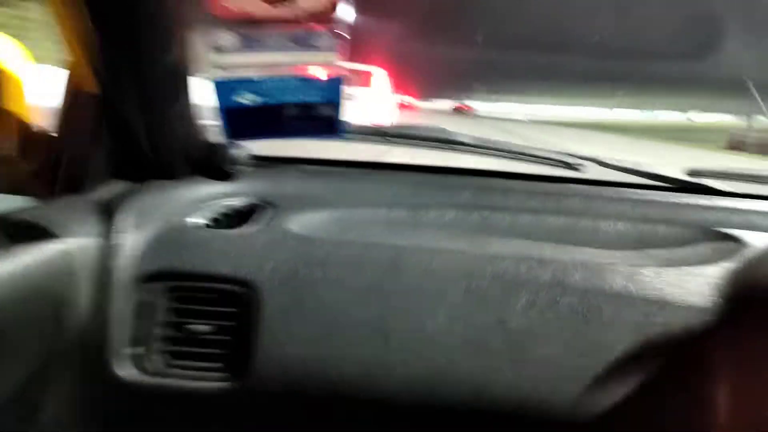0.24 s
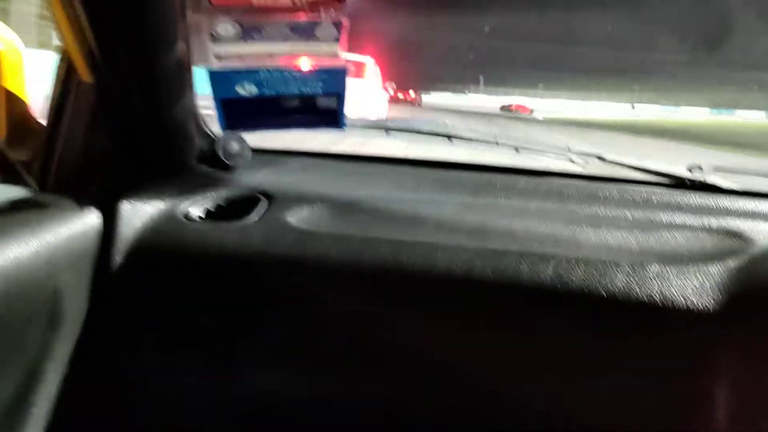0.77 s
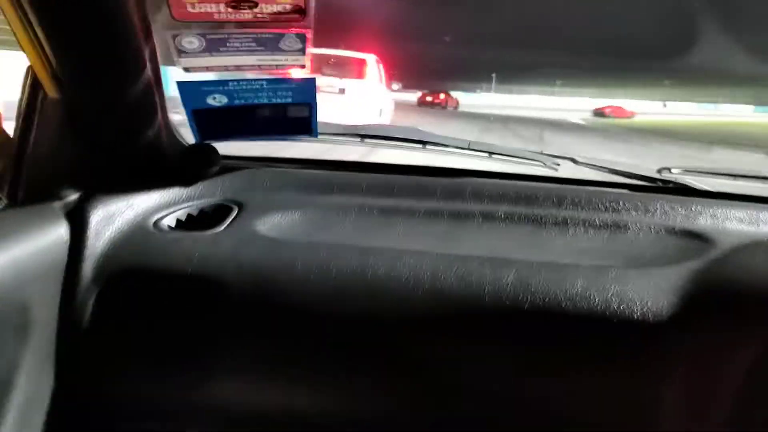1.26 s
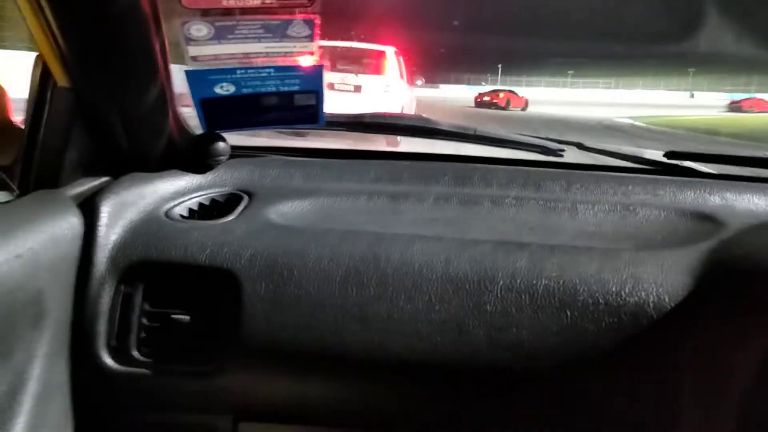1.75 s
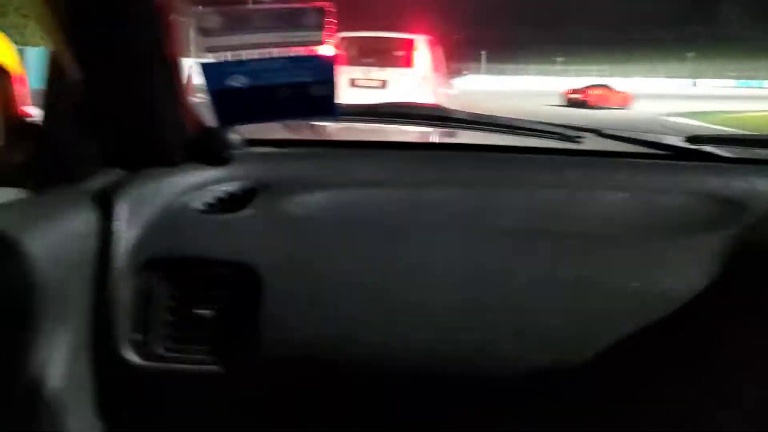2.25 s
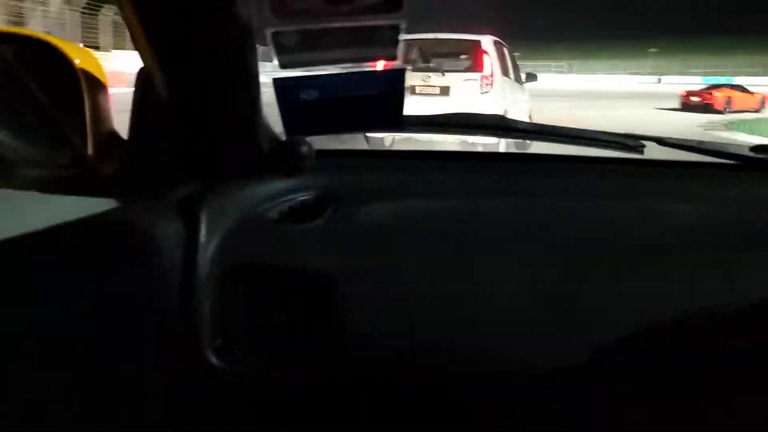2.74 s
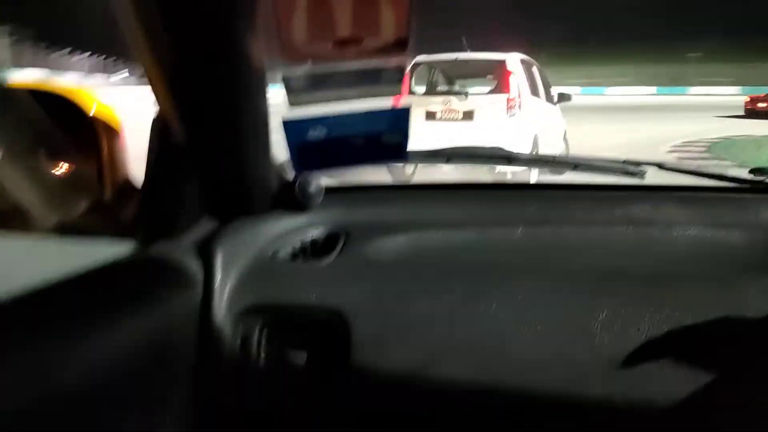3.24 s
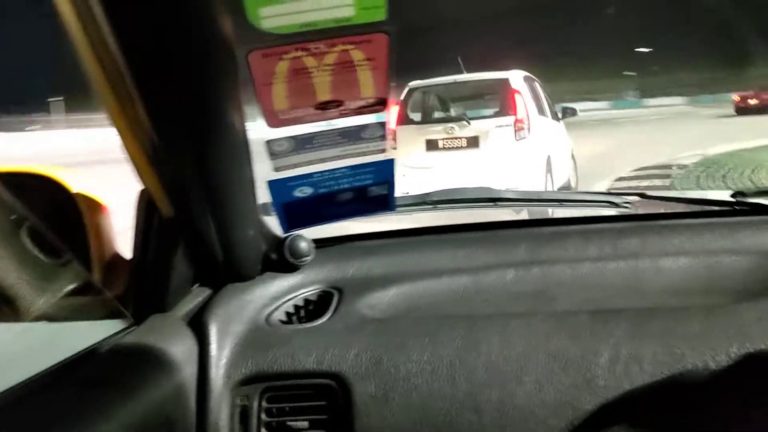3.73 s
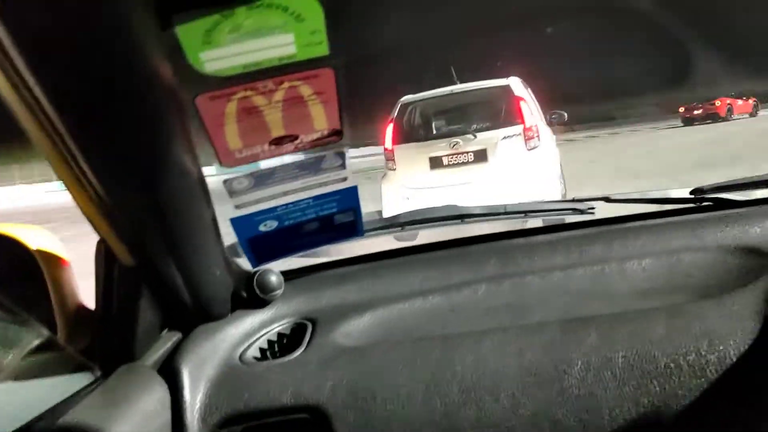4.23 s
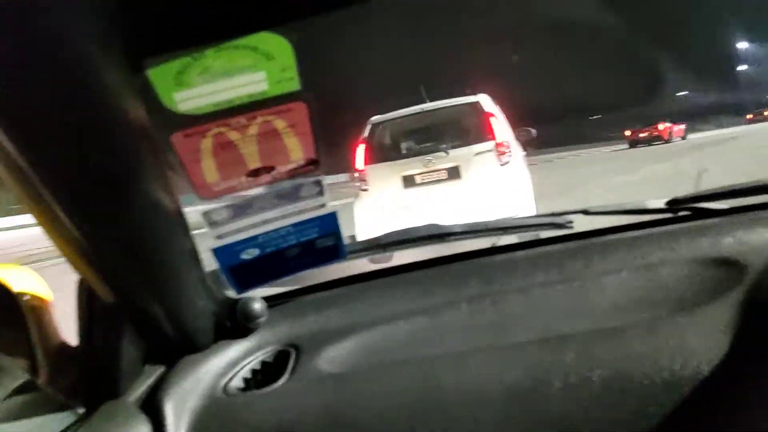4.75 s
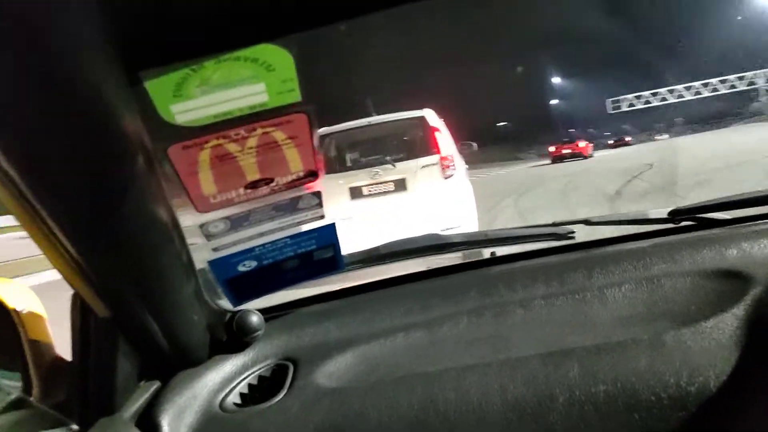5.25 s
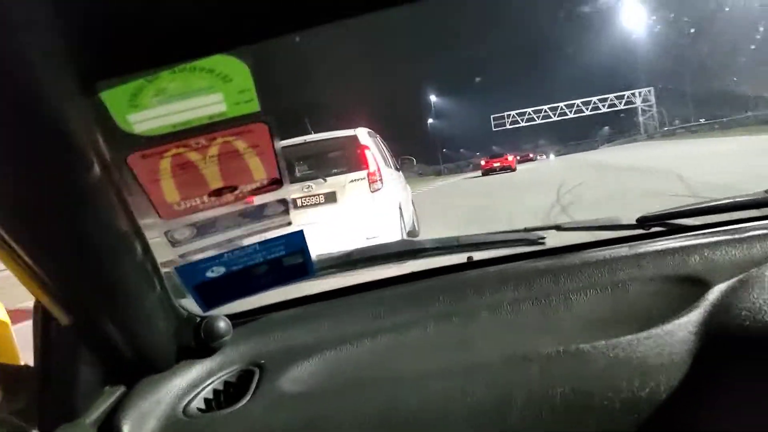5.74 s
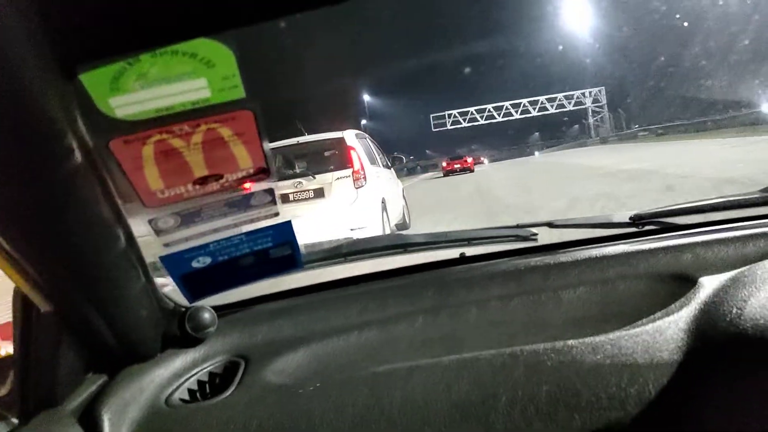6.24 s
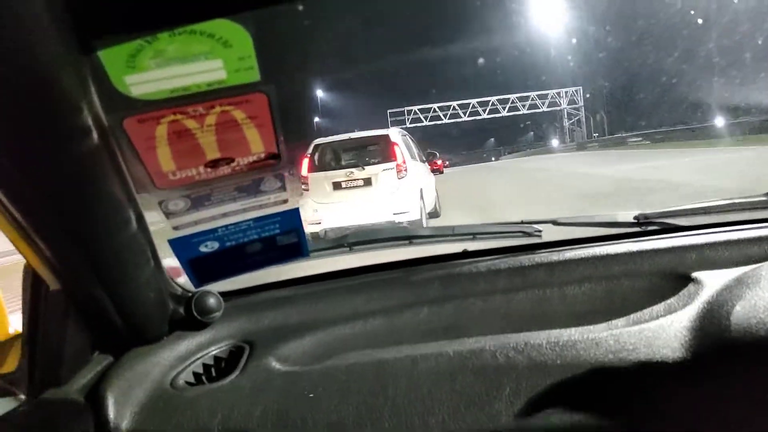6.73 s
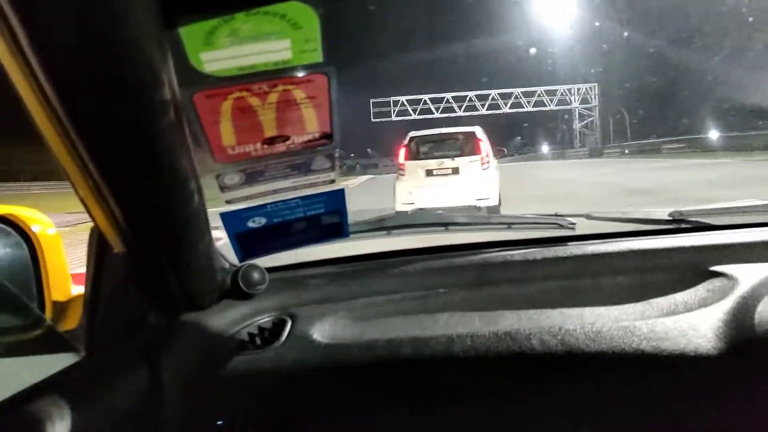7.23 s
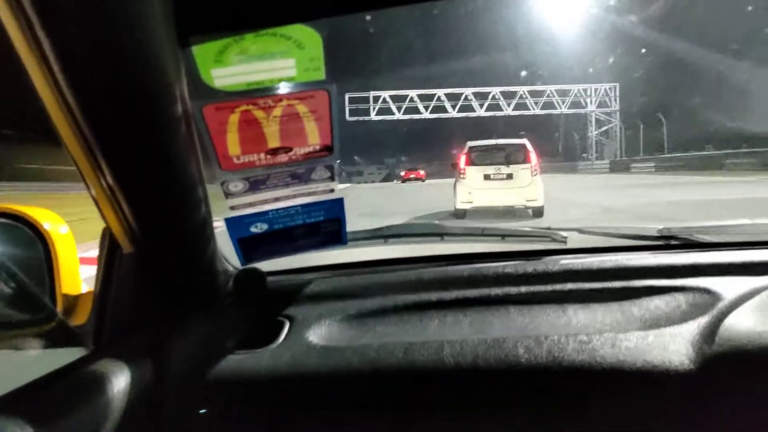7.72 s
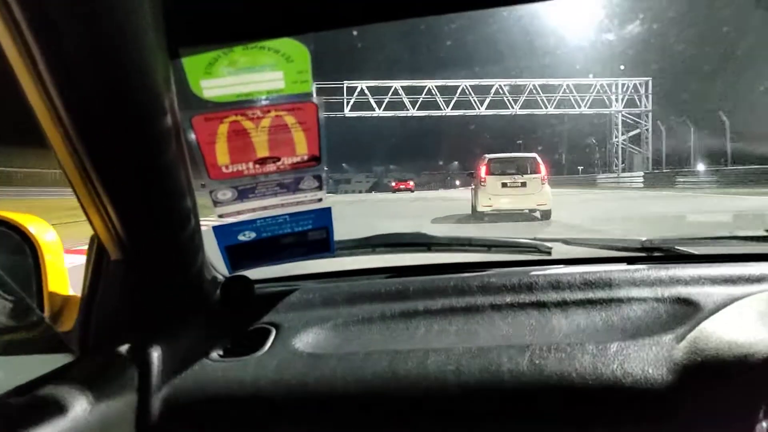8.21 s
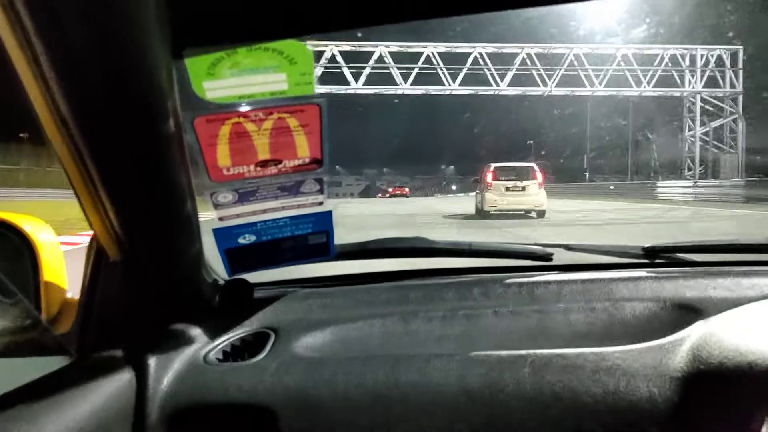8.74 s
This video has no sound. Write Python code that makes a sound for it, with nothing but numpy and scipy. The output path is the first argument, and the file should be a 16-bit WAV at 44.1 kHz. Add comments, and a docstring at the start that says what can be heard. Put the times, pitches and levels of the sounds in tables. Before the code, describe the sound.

Inside a small car's cabin on a circuit, a four-cylinder engine dominates as a deep, muffled boom. It starts off-throttle; at 0.2 s a sharp blip snaps the revs up, fading by 0.5 s, and a softer rise follows around 0.8-1.0 s as the clutch bites. From 1.2 to 3.4 s the engine coasts, pitch sliding down, with a faint sinking hum and small plastic ticks, clearest near 1.7 s. The note dips near 3.45 s, then throttle returns, rocking the pitch slightly; road roar swells around 3.9 s. At 4.2 s comes a very short mid-high squeak, with a crisp tick just after. From 4.5 s the engine pulls at full throttle, low and nearly level until 6 s, then climbing slowly and growing raspier to 9 s, still pulling. Low road rumble eases while fine trim buzz, soft hissy swells and occasional ticks continue, mostly left.

```python
"""Small car on a circuit, heard from the cabin

A four-cylinder car brakes with two throttle blips, rounds a bend and pulls away. Multiples of the firing
rate boom; a pulse train gives the rasp. Shaped noise makes road rumble, roar, buzzing trim and swelling
bands; noise bursts tick, swept sines hum and squeak. Two ports a short way apart, the left more open."""
import sys
import numpy as np
from scipy import signal
from scipy.fft import rfft, irfft, next_fast_len
from scipy.io import wavfile
from scipy.ndimage import uniform_filter1d

SR = 44100
rng = np.random.default_rng(int(sys.argv[2]) if len(sys.argv) > 2 else 0)


def pcm_store(signal):
    """Save signal as 16-bit PCM."""
    levels = np.round(np.clip(np.atleast_2d(signal), -1, 1) * 32767)
    wavfile.write(sys.argv[1], SR, levels.astype(np.int16).T)


N = 396018

# firing rate before driveline swings, two blips, long fall into the bend, pull: start_s, firings_per_s
SPEED = [(0.0, 170.0), (0.16, 163.8), (0.33, 190.6), (0.37, 194.5), (0.56, 184.3), (0.69, 180.9),
         (0.8, 186.2), (1.0, 203.8), (1.04, 205.1), (1.17, 199.0), (1.46, 190.8), (2.42, 157.1),
         (2.68, 151.2), (3.21, 145.3), (3.9, 144.0), (4.24, 142.3), (5.05, 142.2), (5.4, 141.0),
         (5.99, 142.8), (6.86, 150.9), (8.07, 162.4), (8.97, 172.0)]
# driveline rocking the revs: start_s, swing_firings_per_s, decay_s
SHUNTS = [(3.43, 2.6, .35), (4.3, 2.6, .2), (4.96, 1.1, 2.0)]
SHUNT_HZ = 3.75
# pedal: start_s, throttle_0_to_1
THROTTLE = [(0.0, 0.08), (0.14, .1), (0.19, 0.98), (0.27, .9), (0.32, 0.5), (0.38, 0.08), (0.72, 0.04),
            (0.9, 0.3), (1.2, 0.08), (3.38, 0.02), (3.56, 0.6), (3.76, 0.87), (4.33, .9), (4.55, 1),
            (8.98, 0.95)]
# engine tone in the cabin, full throttle: pitch_hz, level_db
PULLING = [(141, -8.5), (144, -8), (152, -6), (155, -6.5), (158, -11.5), (162, -17.5), (167, -14),
           (190, -12), (281, -15.5), (286, -15.5), (296, -20), (306, -22.5), (325, -19), (344, -22),
           (426, -36.5), (444, -41), (460, -35), (468, -53), (476, -33), (500, -25), (530, -31.5),
           (564, -37), (580, -30), (595, -35), (612, -45.5), (635, -47.5), (650, -40.5), (688, -35.5),
           (715, -42.5), (780, -34.5), (812, -45.5), (860, -36)]
# engine tone in the cabin, throttle shut, before the drop below: pitch_hz, level_db
COASTING = [(145, -7), (149, -7.5), (156, -10.5), (160, -16), (165, -14), (173, -19), (177, -16),
            (186, -15.5), (191, -12.5), (204, -11), (298, -37), (320, -31), (346, -40), (354, -36),
            (370, -38), (382, -35.5), (398, -26.5), (432, -41), (447, -52), (500, -41), (600, -39.5),
            (700, -54), (750, -32), (810, -33)]
# offset of firing multiples 1-5 from the coasting curve: offset_db
COAST_DROP_DB = [0.5, -1, -1, -12.5, -22.5]
# offset of multiples 1-5 while the engine spins free, throttle shut: offset_db
FREE_COAST_DB = [0.5, -9, -3, -10.5, -1.5]
# the same at full throttle: offset_db
FREE_PULL_DB = [1, -2, -1.5, -14, -7]
CLUTCH_BITES_S, CLUTCH_SLIP_S = 0.87, 0.08  # spinning free fades out over the slip, ending at the bite
# phase by which multiples 1-5 trail: lag_rad
LAG_RAD = [1.5, 2.46, -0.52, 2.5, 1.6]
# quick unsteadiness of multiples 1-5: rms_db
WAVER_DB = [0.35, 0.36, 0.74, 0.7, 0.35]
# brief sinking of the firing note, bell-shaped: centre_s, half_length_s, change_db
DIPS = [(0.0, 0.28, -4), (0.378, 0.041, -16.5), (0.544, 0.085, -4), (3.459, 0.2, -8.5), (5.414, 0.45, -1)]
# line at 11/4 of the firing rate, swelling late in the pull: start_s, level_db
ELEVENTH = [(7.7, -55), (8.05, -42), (8.3, -34), (8.7, -32), (8.98, -31)]
# crank-turn tones at 1.5, 2.5 .. 5.5 times the firing rate, full throttle: level_db
HALVES_DB = [-37.5, -48, -48.5, -56, -54]
HALF_SHUT_DB, HALF_WAVER_DB = -12, 3
RASP_SHUT_DB, RASP_OPEN_DB, RASP_POWER = -54.5, -37, 6.5  # opens late in the pedal travel
RASP_DB_PER_HZ, RASP_FROM_HZ = 0.081, 146  # full-throttle rise with firing rate
# cylinder inequality by quarters past a firing multiple, 0-3 (0 unused): gain_db
UNEVEN_DB = [-1.5, 3.5, -5.4, -0.8]
# cabin resonances passing the rasp: pitch_hz, width_hz, gain_db
CABIN = [(847, 73, -1), (1001, 65, -1), (1130, 260, -7.5), (1293, 66, -2), (1510, 35, -2.5), (1670, 85, -6),
         (1823, 120, -7), (2060, 180, -5), (2160, 150, -7), (2570, 120, -19.5), (2740, 170, -20)]
# cabin gain for lines between firing multiples: pitch_hz, gain_db
BETWEEN = [(30, -8.5), (80, -1.5), (125, 0), (190, -5.5), (250, 1), (330, -8), (410, -15), (465, -5),
           (520, -14), (600, -19.5), (800, -27), (1500, -32.5), (3200, -40.5)]
# standing waves, engine tones at the ports: pitch_hz, left_lead_rad, left_minus_right_db
STANDING = [(150, .1, 0), (300, .22, 0), (430, 1.2, -4), (475, 0, 1), (530, -.2, 1), (570, 2.6, -3),
            (595, .9, -2), (710, .7, -4), (790, .2, 2), (850, -1.8, 5), (1000, 1.4, -3), (1150, .6, 2),
            (1400, .5, 0), (2000, 0, 0)]
# loose parts ticking, before the colour gains: start_s, peak_db, t60_s, treble_share_db
TICKS = [(0.3876, -47.5, 0.18, 0), (1.6412, -52, 0.11, 9.5), (1.6906, -38, 0.19, -1.5),
         (2.2287, -50, 0.058, 6.5), (2.3442, -53, 0.054, -3), (2.396, -57, 0.12, 6),
         (2.539, -54.5, 0.096, -6.5), (2.6375, -55, 0.12, 1), (3.6106, -57.5, 0.12, -5),
         (3.9379, -52, 0.12, -5.5), (4.2782, -38, 0.12, 5), (4.337, -51, 0.095, 1), (7.4204, -43, 0.12, -3),
         (8.694, -48.5, 0.085, 3), (8.9484, -50, 0.08, 8.5)]
# colour of the tick's knock: pitch_hz, gain_db
TICK_LOW = [(1500, -27), (2600, -0.5), (3600, -7.5), (4700, 5.5), (5600, -16), (7000, -28)]
# colour of the tick's fizz: pitch_hz, gain_db
TICK_HIGH = [(4000, -26.5), (6500, -7.5), (9000, -10), (11000, -11), (14000, 0), (15700, -9.5)]
# short squeak: start_s, pitch_hz, level_db
SQUEAK = [(4.185, 1680, -57), (4.21, 1600, -22), (4.24, 1615, -28.5), (4.265, 1619, -36), (4.29, 1647, -34),
          (4.31, 1620, -58)]
# noise bands, narrow to broad, swelling and fading: probably trim and tyres, two flanking the squeak:
# start_s, end_s, pitch_hz, width_hz, level_db
SWELLS = [(3.492, 3.905, 2696, 60, -50.5), (4.096, 4.423, 1474, 900, -39.5), (3.648, 5.304, 594, 48.4, -36),
          (4.677, 4.955, 1295, 61.4, -46), (4.9, 5.66, 6730, 200, -65.5), (5.901, 6.6, 4370, 500, -47.5),
          (6.301, 7.0, 4070, 250, -47.5), (7.261, 7.56, 4010, 1800, -46.5), (4.17, 4.261, 1393, 70, -45),
          (4.2, 4.33, 1830, 160, -43), (6.301, 6.909, 3550, 193.5, -58), (7.053, 7.496, 4870, 200, -51.5),
          (7.199, 7.648, 3290, 600, -44.5), (7.266, 7.747, 4470, 890, -44), (7.655, 7.74, 4550, 607, -39),
          (7.71, 7.996, 4300, 200, -51.5), (7.756, 7.997, 4800, 250, -47.5),
          (8.016, 8.344, 4790, 500, -48.5), (7.999, 8.9, 2904, 255, -53.5)]
LOOSE = 1.6  # unshared part of swells and ticks, relative to the shared part
# hum sinking with road speed under braking: start_s, pitch_hz, level_db
HUM = [(1.25, 127.8, -27.5), (1.4, 122.9, -20), (1.7, 118.5, -20.5), (1.8, 118.7, -32),
       (2.05, 112.9, -25.5)]
# road noise levels: start_s, rumble_db, roar_db
ROAD = [(0.0, -19.5, -37), (0.44, -21, -38.5), (1.23, -24, -38), (1.75, -28.5, -40.5), (2.42, -26, -41.5),
        (3.3, -27.5, -39.5), (3.93, -26, -32), (4.2, -27, -34.5), (4.5, -24, -35.5), (4.75, -28.5, -36),
        (5.05, -25.5, -36), (5.4, -30.5, -38), (6.1, -32.5, -41), (6.5, -31, -44), (7.0, -31.5, -46.5),
        (7.47, -31, -45.5), (8.0, -29.5, -44.5), (8.51, -29, -37), (8.97, -27, -42)]
# trim buzz level: start_s, level_db
TRIM = [(0.0, -46), (0.35, -45.5), (0.82, -48), (1.23, -46.5), (2.18, -51), (2.42, -49.5), (3.04, -52.5),
        (3.6, -50), (4.1, -51), (4.72, -52.5), (4.89, -47.5), (5.15, -49), (5.45, -44.5), (5.76, -48.5),
        (5.98, -45.5), (6.21, -49), (6.43, -46.5), (7.06, -50), (7.47, -47), (7.65, -46), (7.91, -44),
        (8.04, -47.5), (8.23, -46), (8.51, -47.5), (8.74, -45.5), (8.97, -46.5)]
FIZZ_DB, FIZZ_PER_BUZZ = -68.5, 1.9  # fizz at a buzz of -47.5 dB; fizz dB per buzz dB
# road rumble spectrum: pitch_hz, density_db_per_hz
RUMBLE = [(20, -20), (30, -14.5), (45, 5.5), (70, -1), (120, 3), (180, -3), (260, -11.5), (400, -57),
          (700, -51.5)]
# roar spectrum: pitch_hz, density_db_per_hz
ROAR = [(120, -9), (200, 10.5), (330, 4.5), (400, 3.5), (600, -6), (900, -8.5), (1100, -6), (1400, -12),
        (2000, -19.5), (2800, -33)]
# trim buzz spectrum: pitch_hz, density_db_per_hz
BUZZ = [(700, -12.5), (1200, -3), (1600, -3), (2100, -1.5), (2850, -2), (3650, -6.5), (4500, 0), (4900, -6),
        (5500, -19), (6000, -27.5)]
# fizz spectrum: pitch_hz, density_db_per_hz
FIZZ = [(3410, -34.5), (5800, -7), (7100, -0.5), (8280, -14), (8770, -7.5), (9530, -13.5), (13000, -9.5),
        (14000, -12.5), (15600, -30.5)]
# likeness of the noise at the ports: pitch_hz, likeness_0_to_1
SAME = [(60, .985), (130, .98), (290, .95), (640, .7), (1400, .55), (3000, .5), (7000, .42), (15000, .5)]
# port level difference: pitch_hz, left_minus_right_db
LEFT_DB = [(60, -.3), (110, -.5), (200, -1.3), (380, -.5), (700, -1), (1290, 5), (2380, 10), (4400, 8.5),
           (8120, 5), (13000, 12)]
PORT_S = 0.00035  # left port hears later by this much above the bass
EDGE_HZ = 15750


def engine():
    """Boom: sines at the firing multiples; rasp and unevenness: harmonics of the four-firing cycle."""
    throttle = np.clip(columns(THROTTLE, np.arange(N) / SR)[0], 0, 1)
    angle = 2 * np.pi * firing_turns()
    rasp, uneven = pulse_train(angle, throttle)
    out = heard(np.sqrt(2) * boom(angle, throttle), standing)
    out += heard(rasp, lambda hz: cabin(hz) * standing(hz))
    return out + heard(uneven, lambda hz: shape(BETWEEN, hz) * standing(hz))


def boom(angle, throttle):
    """Five firing multiples, the 11/4 line and the half multiples, most levels set by throttle."""
    t = np.arange(N) / SR
    out = np.zeros(N)
    for k in range(1, 6):
        level_db = multiple_db(k, throttle)
        if k == 1:
            level_db = level_db + sum(db * np.exp(-((t - s) / half_s) ** 2) for s, half_s, db in DIPS)
        level_db = level_db + WAVER_DB[k - 1] * wander(810)
        out += gain_of(level_db) * np.cos(k * angle - LAG_RAD[k - 1])
    out += gain_of(columns(ELEVENTH, t)[0]) * np.cos(11 * angle / 4)
    for k, open_db in enumerate(HALVES_DB):
        half_db = open_db + HALF_SHUT_DB * (1 - throttle) + HALF_WAVER_DB * wander(4500)
        out += gain_of(half_db) * np.cos((k + 1.5) * angle + 2 * np.pi * rng.random())
    return out


def pulse_train(angle, throttle):
    """In-phase upper firing multiples make pulses; unequal cylinders add the lines between."""
    rasp_db = RASP_SHUT_DB + (RASP_OPEN_DB - RASP_SHUT_DB) * throttle ** RASP_POWER
    rasp_db += throttle * RASP_DB_PER_HZ * (firing_rate() - RASP_FROM_HZ)
    cycle = np.exp(1j * (angle + 0.015 * wander(1200)) / 4)  # firings slightly early or late
    turn, rasp, uneven = np.ones(N, complex), np.zeros(N), np.zeros(N)
    for k in range(1, 85):
        turn = turn * cycle
        if k % 4:
            phase = np.exp(2j * np.pi * rng.random())
            uneven += gain_of(UNEVEN_DB[k % 4]) * (turn * phase).real
        elif k > 20:  # the boom holds the first five multiples
            rasp += turn.real
    rasp *= gain_of(rasp_db + 0.42 * wander(1500))
    uneven_db = -40 + 0.23 * (rasp_db + 36.5)  # follows the throttle only a little
    uneven *= gain_of(uneven_db + 1.0 * wander(1700))
    return rasp, uneven


def firing_rate():
    """Firings per second, rocked by dying swings of the driveline."""
    t = np.arange(N) / SR
    rate = columns(SPEED, t)[0]
    for start_s, swing, decay_s in SHUNTS:
        since_s = np.maximum(t - start_s, 0)
        rate = rate + swing * np.exp(-since_s / decay_s) * np.sin(2 * np.pi * SHUNT_HZ * since_s)
    return rate


def firing_turns():
    """Count of firings so far: the integral of the firing rate."""
    return np.cumsum(firing_rate()) / SR


def multiple_db(k, throttle):
    """Level of the k-th multiple: cabin response at its pitch, blended from coasting to pulling."""
    hz, t = k * firing_rate(), np.arange(N) / SR
    free = np.clip((CLUTCH_BITES_S - t) / CLUTCH_SLIP_S, 0, 1)
    pulling_db = read(PULLING, hz) + free * FREE_PULL_DB[k - 1]
    coasting_db = read(COASTING, hz) + COAST_DROP_DB[k - 1] + free * FREE_COAST_DB[k - 1]
    return throttle * pulling_db + (1 - throttle) * coasting_db


def cabin(hz):
    """Sum of cabin resonances, neighbours of opposite sign."""
    total = 0
    for k, (mode_hz, width_hz, db) in enumerate(CABIN):
        total = total + (-1) ** k * gain_of(db) / (1 + 2j * (hz - mode_hz) / width_hz)
    return total


def standing(hz):
    """Phase and level of engine tones at the ports, set apart by standing waves."""
    f, lead_rad, left_db = np.transpose(STANDING)
    half = gain_of(np.interp(hz, f, left_db) / 2) * np.exp(0.5j * np.interp(hz, f, lead_rad))
    return np.array([half, 1 / half])


def ticks():
    """Loose parts: dying noise bursts, a knock below and a fizz above."""
    t = np.arange(4410) / SR
    knock, fizz = np.zeros((2, 2, N + len(t)))
    for start_s, peak_db, t60_s, treble_db in TICKS:
        start = round(start_s * SR)
        at = slice(start, start + len(t))
        attack = np.minimum(t / 0.0028, 1)
        burst = gain_of(peak_db - 60 * t / max(t60_s, 0.01)) * attack * loose(len(t))
        knock[:, at] += gain_of(-treble_db - 130 * t) * burst  # dies sooner
        fizz[:, at] += burst
    low = gain_of(15) * heard(knock, lambda hz: shape(TICK_LOW, hz))
    return low + gain_of(1.5) * heard(fizz, lambda hz: shape(TICK_HIGH, hz))


def tone(rows, rough_rad):
    """Sine following a pitch and level table, phase roughened, silent outside it: squeak or hum."""
    t = np.arange(N) / SR
    hz, db = columns(rows, t)
    inside = uniform_filter1d(1. * (t > rows[0][0]) * (t < rows[-1][0]), size=600)
    wave = np.sin(2 * np.pi * np.cumsum(hz) / SR + rough_rad * wander(160))
    return heard(np.sqrt(2) * gain_of(db) * inside * wave)


def swells():
    """Resonator-filtered noise shifted up to each band, under a rounded, fluttering envelope."""
    out = np.zeros((2, N))
    for start_s, end_s, hz, width_hz, db in SWELLS:
        t = np.arange(round((end_s - start_s) * SR)) / SR
        r = np.exp(-np.pi * width_hz / SR)
        slow = signal.lfilter([1], [1, -2 * r, r ** 2], loose(len(t)) + 1j * loose(len(t)))
        band = evened((slow * np.exp(2j * np.pi * hz * t)).real)
        band = band * signal.windows.tukey(len(t), 0.6)
        flutter = evened(uniform_filter1d(rng.standard_normal(len(t)), 1500))
        out[:, round(start_s * SR):][:, :len(t)] += band * gain_of(db + 1.3 * flutter)
    return heard(out)


def road_and_trim():
    """Shaped noise for rumble, roar, buzz and fizz; each firing shakes the buzz."""
    t = np.arange(N) / SR
    rumble_db, roar_db = columns(ROAD, t)
    buzz_db = columns(TRIM, t)[0]
    fizz_db = FIZZ_DB + FIZZ_PER_BUZZ * (buzz_db + 47.5)
    shake = 1 + 0.052 * np.cos(2 * np.pi * firing_turns())
    rumble = gain_of(rumble_db) * noise(RUMBLE, 25, 110, 0.22, 0.2, size=2048)
    roar = gain_of(roar_db) * noise(ROAR, 380, 1300, 1.9, 0.3, size=1024)
    buzz = gain_of(buzz_db) * shake * noise(BUZZ, 2600, 8400, 1.5, 0.9, size=512)
    fizz = gain_of(fizz_db) * noise(FIZZ, 6000, 15000, 3, 1.8, size=512)
    return rumble + roar + buzz + fizz


def noise(points, lo_hz, hi_hz, patchy_db, flicker_db, size):
    """Random short-time spectra with drifting patches, partly alike in the ports, band rms 1."""
    frames, hz = 4 * N // size + 5, np.fft.rfftfreq(size, 1 / SR)
    a, b, c, d, patches = rng.standard_normal((frames, len(hz), 5)).T
    patches = evened(uniform_filter1d(uniform_filter1d(patches, 10, 0), 12, 1))
    flicker = evened(uniform_filter1d(rng.standard_normal(frames), size=3))
    same = np.clip(read(SAME, hz), 0, 1)[:, None]
    first = a + 1j * b
    second = same * first + np.sqrt(1 - same ** 2) * (c + 1j * d)
    z = np.array([first, second]) * ports(hz)[:, :, None]
    z *= shape(points, hz)[:, None] * gain_of(patchy_db * patches + flicker_db * flicker)
    band = (hz > lo_hz) & (hz < hi_hz)
    power = abs(z.mean(0)) ** 2
    share = np.sum(power[band]) / np.sum(power)
    x = signal.istft(z, nperseg=size, noverlap=3 * size // 4)[1][:, :N]
    return x / np.sqrt(np.mean(x.mean(0) ** 2) * share)


def loose(count):
    """Noise for two ports, partly shared."""
    shared, left, right = rng.standard_normal((count, 3)).T
    return (shared + LOOSE * np.array([left, right])) / np.sqrt(1 + LOOSE ** 2)


def ports(hz):
    """Gain and delay of the left and right port; long bass waves reach both together."""
    delay_s = PORT_S * np.clip((hz - 400) / 900, 0, 1)
    tilt = gain_of(read(LEFT_DB, hz) / 2)
    return np.array([tilt * np.exp(-2j * np.pi * hz * delay_s), 1 / tilt])


def heard(x, colour=lambda hz: 1):
    """Filters a sound through a colour into both ports."""
    size = next_fast_len(N + 8192)
    hz = np.fft.rfftfreq(size, 1 / SR)
    return irfft(rfft(x, size) * colour(hz) * ports(hz), size)[:, :N]


def gain_of(db):
    """Amplitude ratio of a level."""
    return 10 ** (np.asarray(db) / 20)


def evened(x):
    """Scales to rms 1."""
    return x / np.sqrt(np.mean(abs(x) ** 2) + 1e-20)


def wander(smooth):
    """Slow random drift of rms 1, smoothed twice over this many samples."""
    once = uniform_filter1d(rng.standard_normal(N), int(smooth))
    return evened(uniform_filter1d(once, int(smooth)))


def read(points, hz):
    """Value at a pitch, interpolated over log frequency."""
    f, value = np.transpose(points)
    return np.interp(np.log(hz + 1), np.log(f + 1), value)


def columns(rows, t):
    """Joins table rows by straight lines in time."""
    s, *values = np.transpose(rows)
    return [np.interp(t, s, v) for v in values]


def shape(points, hz):
    """Spectrum as gains, silent outside its ends."""
    return gain_of(read(points, hz)) * (hz >= points[0][0]) * (hz <= points[-1][0])


def scene():
    """Sum of all sources at the two ports."""
    return engine() + ticks() + tone(SQUEAK, 0.38) + swells() + tone(HUM, 0.52) + road_and_trim()


def record(dry):
    """Converter clipping at full scale, then a low-pass band limit."""
    band_limit = signal.firwin(511, EDGE_HZ, window=("kaiser", 9), fs=SR)
    return signal.oaconvolve(np.clip(dry, -1, 1), band_limit[None], "same")


dry = scene()
out = record(dry)
pcm_store(out)
```